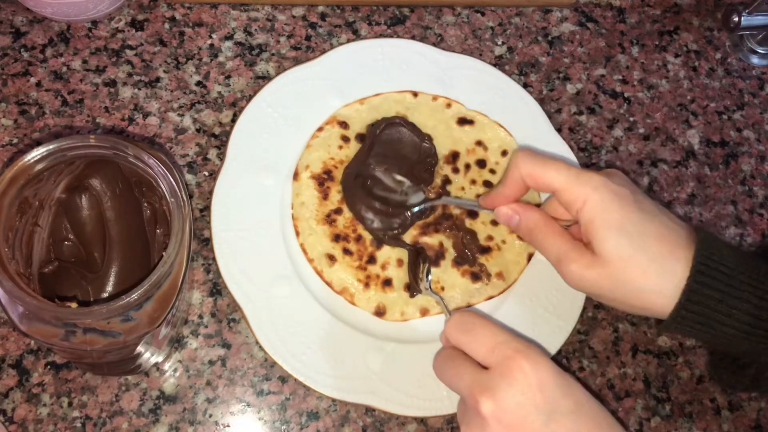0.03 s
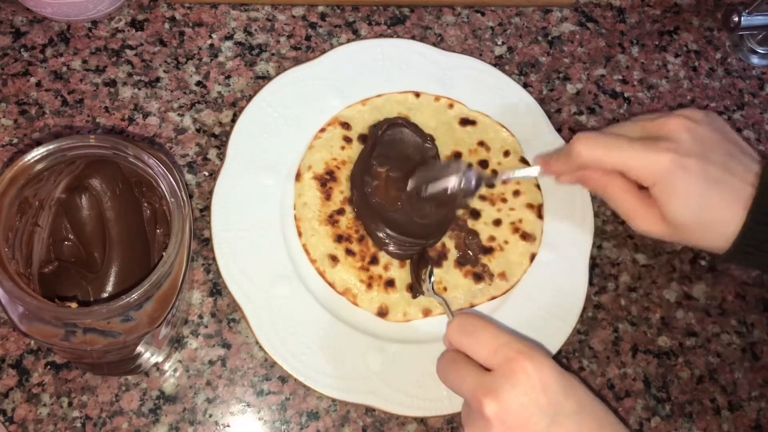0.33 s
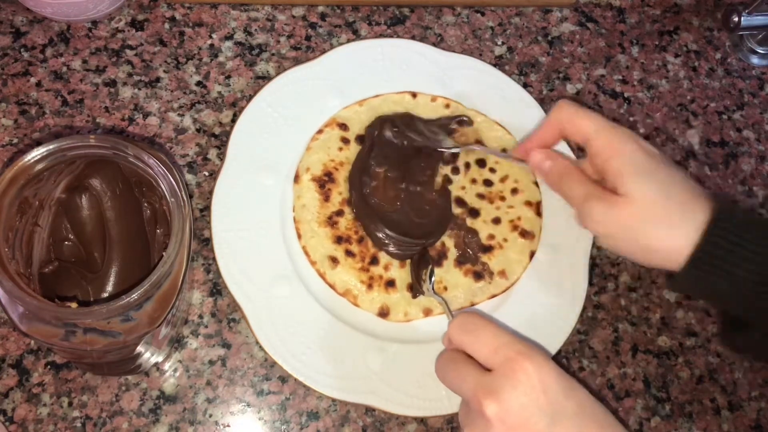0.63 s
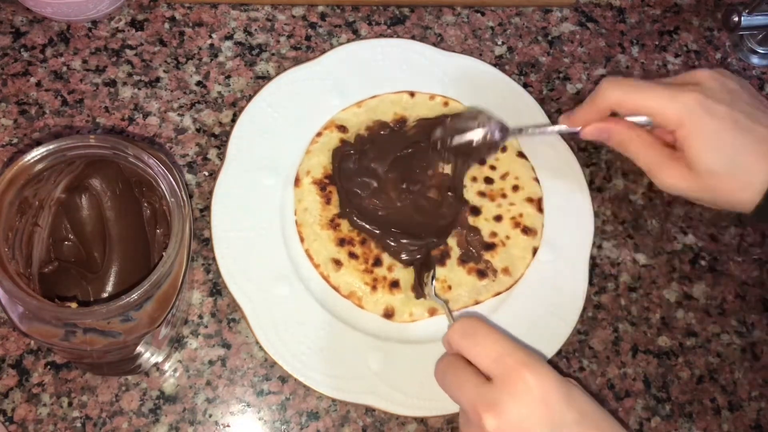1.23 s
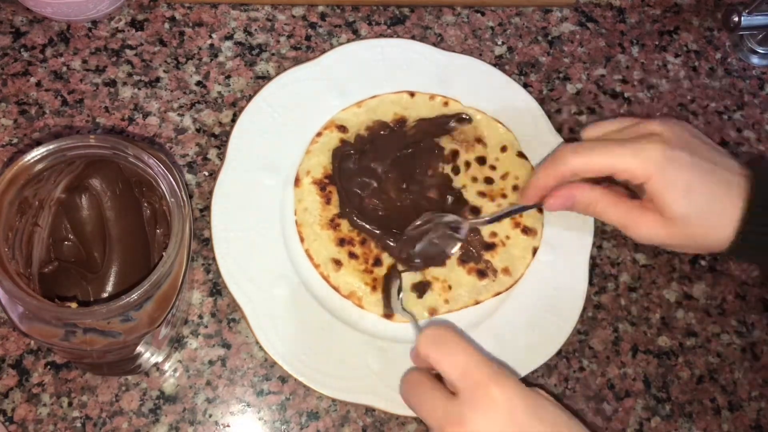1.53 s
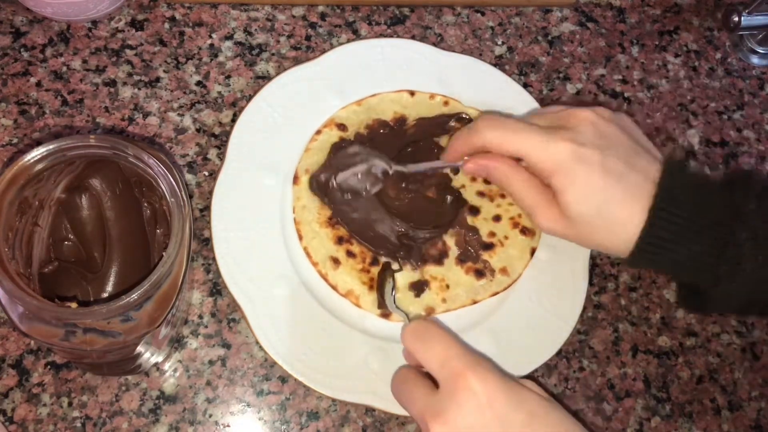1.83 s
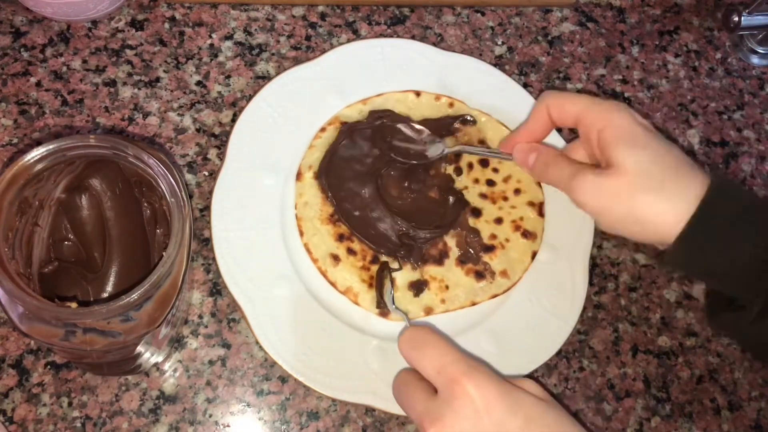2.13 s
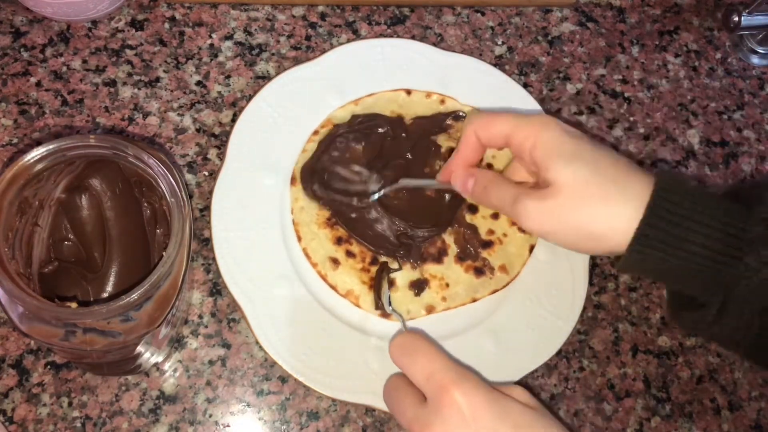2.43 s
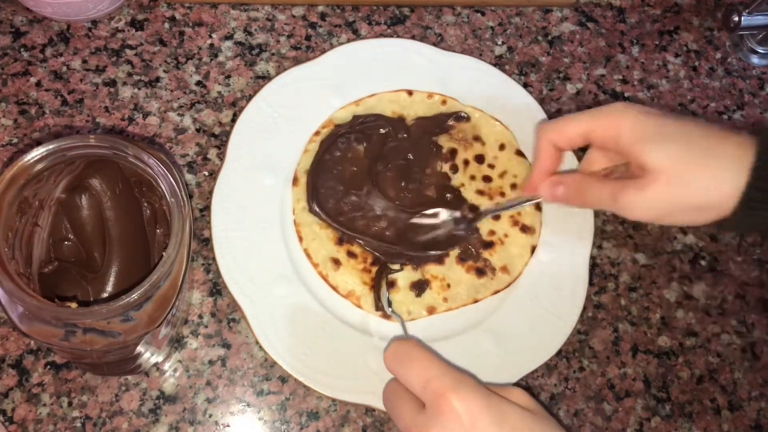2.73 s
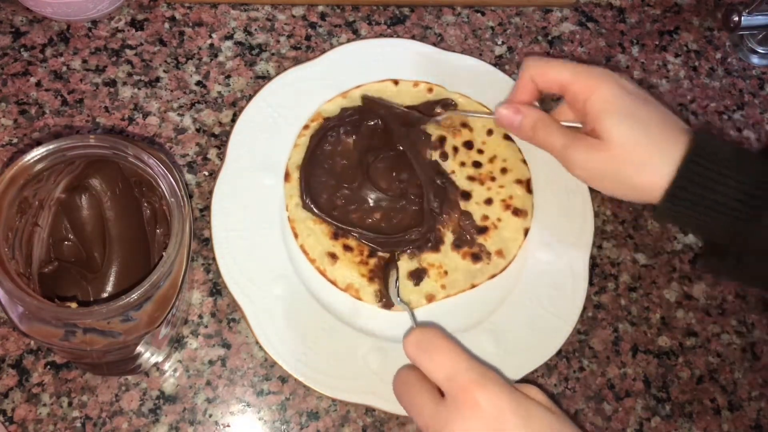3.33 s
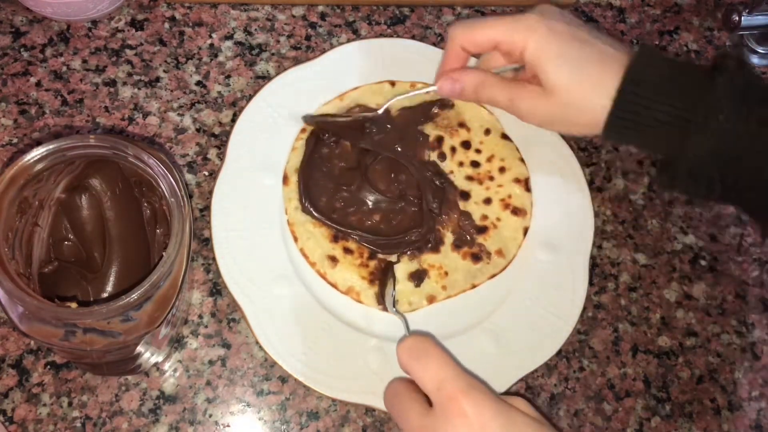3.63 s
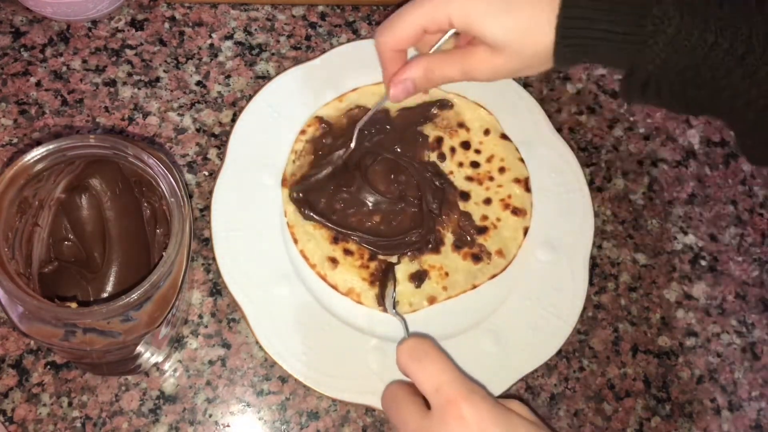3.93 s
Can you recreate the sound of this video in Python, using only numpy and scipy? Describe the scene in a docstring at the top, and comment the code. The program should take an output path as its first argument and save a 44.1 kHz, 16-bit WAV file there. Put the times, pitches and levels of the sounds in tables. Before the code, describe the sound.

Close, soft smearing of a spoon working sticky paste across a pancake, with tiny wet ticks and faint squeaks. Brief clinks on the china plate come now and then, over a low appliance hum in a quiet kitchen.

```python
"""A quiet kitchen: a spoon spreads chocolate paste over a pancake on a china plate.
Each stroke is a soft grainy smear of friction and tiny bursts of paste; at times the spoon squeaks.
The sticky paste ticks as it parts, and now and then cutlery taps the damped plate, which rings briefly.
An appliance, probably a refrigerator, hums behind it all."""
import sys
import numpy as np
from scipy import signal
from scipy.fft import rfft, irfft
from scipy.io import wavfile
from scipy.ndimage import uniform_filter1d

SR = 44100
rng = np.random.default_rng(int(sys.argv[2]) if len(sys.argv) > 2 else 0)


def master(y):
    """Save y as 16-bit WAV."""
    cut = np.clip(np.atleast_2d(y).T, -1, 1)
    pcm = np.round(cut * 32767)  # scale
    wavfile.write(sys.argv[1], SR, pcm.astype(np.int16))


N = 176400
TIME_S = np.arange(N) / SR
FREQS_HZ = np.maximum(np.arange(N // 2 + 1) * SR / N, 1)


def from_db(db):
    return 10 ** (np.asarray(db) / 20)


def unit_rms(x):
    return x / np.sqrt(np.mean(x ** 2) + 1e-20)


def colour(x, spectrum):
    """Filter that takes white noise of rms 1 to a spectrum of (Hz, dB per Hz) points."""
    hz, db = np.transpose(spectrum)
    gain = from_db(np.interp(np.log(FREQS_HZ), np.log(hz), db))
    return irfft(rfft(x) * gain * np.sqrt(SR / 2), N)


def narrow_noise(hz, width_hz):
    """Noise in one steep resonance, rms 1; at 0 Hz a slow drift."""
    rolloff = 1 + (2 * (FREQS_HZ - hz) / width_hz) ** 2
    return unit_rms(irfft(rfft(rng.standard_normal(N)) / rolloff, N))


def band(x, low_hz, high_hz, order=2):
    """Causal band-pass."""
    high_hz = min(high_hz, .47 * SR)
    sos = signal.butter(order, [min(low_hz, high_hz / 1.1), high_hz], "band", fs=SR, output="sos")
    return signal.sosfilt(sos, x)


def bell(hz, centre_hz, octaves):
    """Resonance curve on a pitch axis, 1 at its centre."""
    return 1 / (1 + (np.log2(hz / centre_hz) / octaves) ** 2)


def add(out, start_s, x):
    i = int(np.clip(start_s * SR, 0, N - 1))
    out[i:i + len(x)] += x[:N - i]


def crack(t60_s, ring_gain):
    """An impulse followed by a dense, quickly dying ring."""
    t = TIME_S[:SR // 10]
    x = ring_gain * rng.standard_normal(len(t)) * from_db(-60 * t / t60_s)
    x[0] = 1
    return x


# Each row: time in seconds, level of the hum in dB.
HUM_LEVELS = [(0, -36), (.2, -35.5), (.63, -35.5), (.76, -38), (.95, -35.5), (1.12, -36), (1.42, -39),
              (1.6, -36), (1.7, -39), (1.82, -37.5), (2.06, -35.5), (2.3, -36), (2.72, -35.5), (2.85, -37),
              (2.95, -35.5), (3.6, -36.5), (3.69, -35), (4, -37.5)]
# Each row: time in seconds, level of the low drone in dB.
DRONE_LEVELS = [(0, -57.5), (.55, -58.5), (.8, -53.5), (.95, -62), (1.12, -52), (1.4, -61), (1.62, -49.5),
                (1.9, -55.5), (2.35, -60.5), (2.72, -47), (2.9, -55.5), (3.13, -52), (3.35, -55), (4, -65)]
# Each row: centre in Hz, width in Hz, level in dB.
CASING_TONES = [(146, 6.5, -66), (199.4, 27, -62.5), (308, 36, -66.5), (394.3, 7.7, -69),
                (509.6, 56, -66.5), (552, 11, -73), (711, 10, -73), (740, 16, -76.5), (888.3, 14, -74.5),
                (962, 83, -73), (1486, 13, -76.5), (1530, 106, -75.5), (3070, 24, -95.5)]
# Each row: frequency in Hz, density in dB per Hz.
AIR_SPECTRUM = [(25, -97), (50, -92), (75, -80.5), (115, -69), (150, -77), (190, -85), (250, -88),
                (340, -86), (450, -90.5), (630, -93.5), (800, -93.5), (1000, -97.5), (1150, -99.5),
                (1350, -99.5), (1800, -106), (2400, -108), (3200, -113.5), (4000, -111.5), (5000, -117.5),
                (8000, -121.5), (12000, -123.5), (16000, -122.5)]


def appliance(hum_hz=100.07, drone_hz=168.9, wander_hz=3.37):
    """Mains hum, a drone that swells and fades, wavering casing tones and a rush of room air."""
    hum_db = np.interp(TIME_S, *np.transpose(HUM_LEVELS)) + .23 * narrow_noise(0, 7.3)
    hum = from_db(hum_db) * np.sqrt(2) * np.sin(2 * np.pi * hum_hz * TIME_S)
    drone_db = np.interp(TIME_S, *np.transpose(DRONE_LEVELS)) + 3 * narrow_noise(0, 10)
    pitch_hz = drone_hz + wander_hz * narrow_noise(0, 15.9)
    drone = from_db(drone_db) * np.sqrt(2) * np.sin(2 * np.pi * np.cumsum(pitch_hz) / SR)
    casing = sum(from_db(db) * narrow_noise(hz, width_hz) for hz, width_hz, db in CASING_TONES)
    air = colour(rng.standard_normal(N), AIR_SPECTRUM)
    return hum + drone + casing + air


def kitchen_reverb(x, t60_s=.38, level_db=-16.5, delay_s=.0055):
    """A short diffuse tail off the counter and walls."""
    t = TIME_S[:SR // 2]
    decay = from_db(-60 * t / t60_s) * (t > delay_s)
    tail = band(rng.standard_normal(len(t)), 300, 10000, order=1) * decay
    tail /= np.sqrt(np.sum(tail ** 2))
    return from_db(level_db) * signal.fftconvolve(x, tail)[:N]


# Each row: middle in seconds, length in seconds, level in dB, centre in Hz.
SPOON_SQUEAKS = [(.825, .08, -73.5, 2320), (0.864, 0.062, -69.5, 2580), (2.045, 0.1, -76, 2460),
                 (3.08, 0.11, -78, 2440)]


def spoon_squeaks(width_hz=390):
    """The spoon's back rubs with a soft, hoarse squeak: a narrow band of friction noise."""
    out = np.zeros(N)
    for middle_s, length_s, db, hz in SPOON_SQUEAKS:
        swell = np.exp(-2 * ((TIME_S - middle_s) / length_s) ** 2)
        out += from_db(db) * swell * narrow_noise(hz, width_hz)
    return out


# Each row: frequency in Hz, relative level in dB, T60 in seconds.
SPOON_PLATE_MODES = [(1380, 2, 0.023), (1850, -4, 0.11), (2250, -4, 0.064), (3000, 6, 0.046),
                     (3700, -1, 0.026), (4500, -9, 0.02), (5200, -3, 0.032), (5450, -9, 0.036),
                     (5916, -10, 0.074), (7600, -4.5, 0.025), (8200, 0.5, 0.021), (8800, -18, 0.015),
                     (9600, 1.5, 0.022)]
# Each row: start in seconds, click gain in dB, its low and high edges in Hz, ring gain in dB,
# frequency favoured by the struck spot in Hz.
CUTLERY_TAPS = [(0.9845, -27.5, 4580, 12500, -50, 8400), (0.9855, -29.5, 750, 4140, -62, 2600),
                (1.1478, -34.5, 1150, 4500, -52, 1400), (1.4912, -21, 1150, 4800, -49, 3670),
                (1.492, -28, 1110, 2000, -53, 1600), (1.506, -35, 2500, 6000, -55, 5200),
                (1.528, -29.5, 2400, 5500, -55, 5000), (1.5278, -41, 7500, 10400, -61, 8650),
                (1.817, -35, 1800, 8600, -62, 6560), (3.683, -15, 1500, 2820, -43, 2200),
                (3.685, -25, 5500, 8400, -47, 7500), (3.689, -20, 650, 3020, -49, 2410),
                (3.692, -27.5, 4500, 8060, -47, 6000), (3.695, -23.5, 900, 2980, -53, 2000),
                (3.694, -37, 8000, 11000, -50, 10000)]


def cutlery_taps():
    """Cutlery taps the plate through the pancake; the spot struck decides which modes ring most."""
    out = np.zeros(N)
    t = TIME_S[:SR // 5]
    for start_s, click_db, low_hz, high_hz, ring_db, spot_hz in CUTLERY_TAPS:
        click = band(crack(t60_s=.036, ring_gain=.09), low_hz, high_hz, order=3)
        add(out, start_s, from_db(click_db) * click)
        for hz, mode_db, t60_s in SPOON_PLATE_MODES:
            gain = from_db(ring_db + mode_db) * bell(hz, spot_hz, octaves=.34) ** 2
            ring = np.sin(2 * np.pi * hz * t) * from_db(-60 * t / t60_s)
            add(out, start_s, gain * rng.choice([-1, 1]) * ring)
    return out


def paste_snap(hz, edge_ratio=1.48):
    """One thread or air pocket in the paste snaps."""
    return band(crack(t60_s=.014, ring_gain=.08), hz / edge_ratio, hz * edge_ratio, order=1)


# Each row: start in seconds, relative level in dB, centre in Hz.
PASTE_TICKS = [(.099, -49, 8630), (0.111, -53, 11000), (0.291, -58, 5000), (0.337, -45, 3100),
               (.3745, -59, 7000), (.396, -51, 9000), (0.6522, -43.5, 5450), (0.706, -47, 5000),
               (0.7242, -48.5, 11000), (.739, -47, 7000), (0.785, -46, 13000), (0.9638, -45, 6000),
               (0.9741, -38, 5500), (1.005, -46, 9000), (1.169, -43, 2400), (1.191, -53, 4500),
               (1.2145, -45, 13000), (1.502, -49, 13000), (1.5095, -42, 12000), (1.522, -48, 9000),
               (1.6336, -46, 8000), (1.662, -55, 11000), (1.701, -53, 13000), (2.152, -55, 14000),
               (2.215, -52, 8000), (2.366, -52, 4000), (2.513, -56, 10000), (2.5855, -55, 11000),
               (2.9664, -48, 5000), (3.135, -56, 12000), (3.406, -43, 13000), (3.448, -48, 10100),
               (3.7671, -41, 3500), (3.876, -50, 7000)]


def sticky_ticks(gain_db=8.5, strays_per_s=12, stray_db=-70, stray_hz=9000):
    """The paste ticks as it parts; fainter stray ticks come at random."""
    out = np.zeros(N)
    for start_s, db, hz in PASTE_TICKS:
        add(out, start_s, from_db(gain_db + db) * paste_snap(hz))
    strays = (rng.random(N) < strays_per_s / SR) * from_db(stray_db + rng.uniform(-2, 3.7, N))
    return out + signal.fftconvolve(strays, paste_snap(stray_hz))[:N]


def paste_grains(grains_per_s=4500, spread_db=2.5, bands=8):
    """Tiny bursts of paste, each in one frequency band; rms 1."""
    edges_hz = np.geomspace(1178, 16400, bands + 1)
    out = np.zeros(N)
    for low_hz, high_hz in zip(edges_hz, edges_hz[1:]):
        sizes = from_db(spread_db * np.minimum(rng.exponential(1, N), 5)) * rng.choice([-1, 1], N)
        onsets = rng.random(N) < grains_per_s / SR / bands
        out += band(sizes * onsets, low_hz, high_hz)
    return unit_rms(out)


# Each row: frequency in Hz, base density in dB per Hz.
FRICTION_SPECTRUM = [(400, -106), (1000, -102), (1700, -101.5), (2600, -104), (3800, -106), (5200, -110),
                     (8500, -110.5), (12000, -112.5), (15500, -111)]


def paste_friction(grain_share=.37, flutter_db=2):
    """Grains and smooth friction noise, with a fluttering level."""
    rub = np.sqrt(grain_share) * paste_grains() + np.sqrt(1 - grain_share) * rng.standard_normal(N)
    return colour(rub, FRICTION_SPECTRUM) * from_db(flutter_db * narrow_noise(0, 53))


# Each row: start in seconds, length in seconds, gain in dB, tilt in dB per octave,
# squelch resonance in Hz at the start and at the end.
SPOON_STROKES = [(-0, 0.24, -19, -1, 2900, 2400), (0.275, 0.14, -7.5, 2, 6500, 9200),
                 (0.456, .07, -13.5, 6, 9000, 10500), (0.693, 0.15, -16, 2, 11000, 10500),
                 (0.943, 0.071, -4.5, -0.5, 5500, 7500), (1.12, 0.091, -5.5, 1, 11000, 10500),
                 (1.498, 0.039, 1, -2, 5200, 5300), (1.574, 0.26, -17.5, -2.5, 11000, 10000),
                 (1.834, 0.2, -7, -4, 4770, 4280), (2.745, 0.12, -3, 0, 7540, 5900),
                 (2.86, 0.045, -14, -7, 9000, 8500), (2.946, 0.039, -6, .7, 7900, 7400),
                 (3.084, 0.031, -8, 0.5, 7000, 8000), (3.373, 0.11, -1, -0.5, 10700, 11300),
                 (3.475, 0.15, -14, 2, 10500, 11000), (3.635, 0.054, -3, 0.5, 9200, 6500),
                 (3.664, 0.13, -3.5, 0, 1900, 2500), (3.813, 0.096, -0.5, 0, 3800, 3500),
                 (3.907, 0.084, -6.5, -.5, 3700, 3300)]


def spoon_smear(attack_s=.059, release_s=.034, resting_db=-14, squelch_octaves=.067, pockets_db=1.9):
    """Friction swells with each stroke; the gap under the spoon adds two gliding resonances."""
    hz, t, frames = signal.stft(paste_friction(), SR, nperseg=512, noverlap=384)
    hz = np.maximum(hz, 1)[:, None]
    tilt_octaves = np.log2(np.maximum(hz, 1500) / 5000)
    gain = np.full(frames.shape, from_db(resting_db))
    for start_s, length_s, db, tilt_db, from_hz, to_hz in SPOON_STROKES:
        rise = np.clip((t - start_s) / attack_s + .5, 0, 1)
        fall = np.clip((start_s + length_s - t) / release_s + .5, 0, 1)
        gap_hz = np.interp(t, [start_s, start_s + length_s], [from_hz, to_hz])
        squelch_db = 7 * bell(hz, gap_hz, squelch_octaves) + 2.5 * bell(hz, 1.34 * gap_hz, squelch_octaves)
        gain += rise * fall * from_db(db + tilt_db * tilt_octaves + squelch_db)
    # Air pockets add passing resonances.
    pockets = uniform_filter1d(rng.standard_normal(frames.shape), size=5, axis=0)
    pockets = uniform_filter1d(pockets, size=14, axis=1)
    gain *= from_db(pockets_db * unit_rms(pockets))
    return signal.istft(frames * gain, SR, nperseg=512, noverlap=384)[1][:N]


def scene():
    """The spoon close by, the hum behind it; only ticks and taps reverberate."""
    contacts = sticky_ticks() + cutlery_taps()
    return (spoon_smear() + spoon_squeaks() + contacts + kitchen_reverb(contacts) + appliance())[None]


def record(dry):
    """Steep low-pass."""
    cutoff_hz = 15800
    return signal.sosfilt(signal.ellip(12, .1, 80, cutoff_hz, fs=SR, output="sos"), dry)


dry = scene()
out = record(dry)
master(out)
```